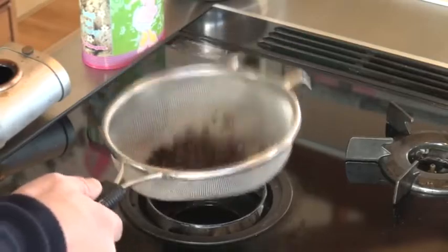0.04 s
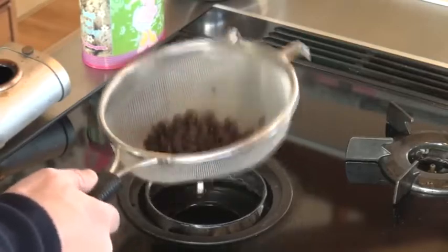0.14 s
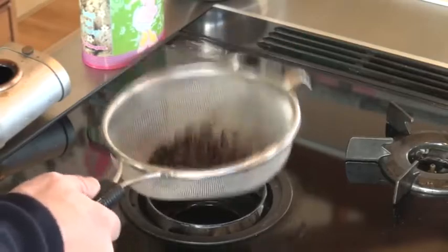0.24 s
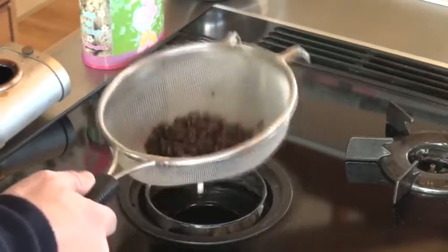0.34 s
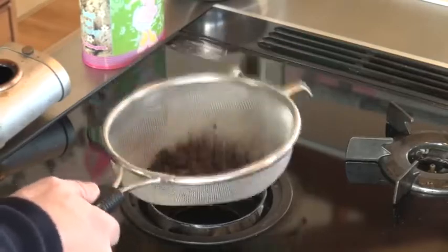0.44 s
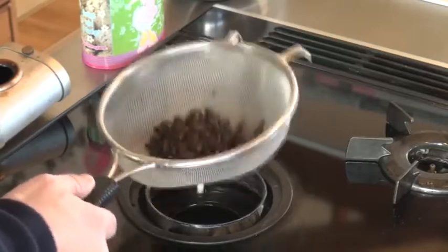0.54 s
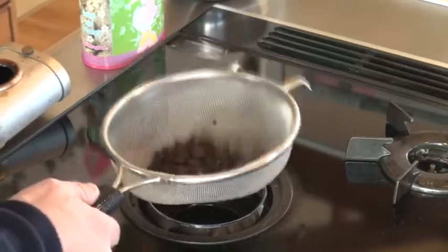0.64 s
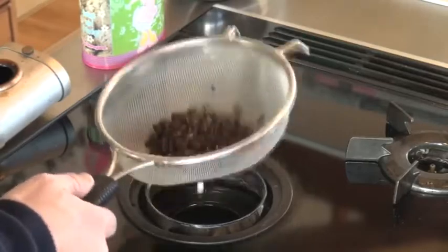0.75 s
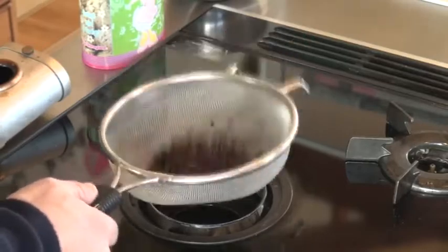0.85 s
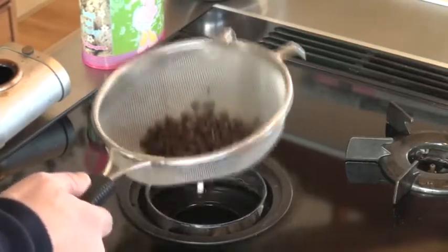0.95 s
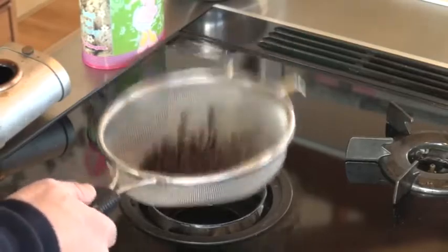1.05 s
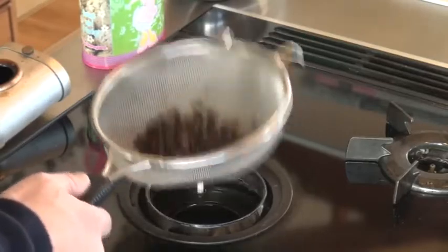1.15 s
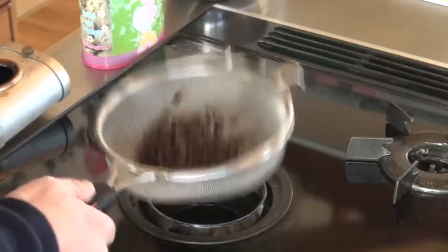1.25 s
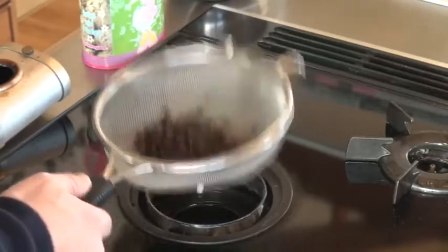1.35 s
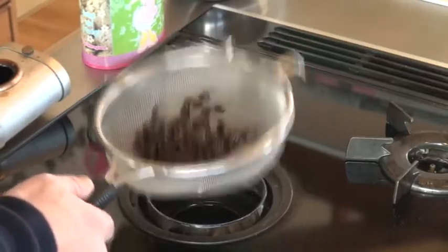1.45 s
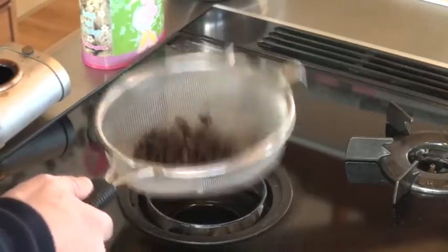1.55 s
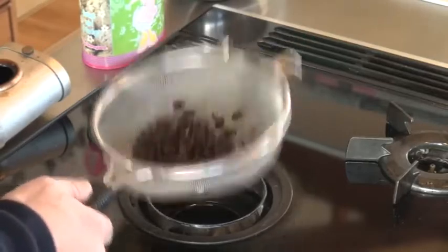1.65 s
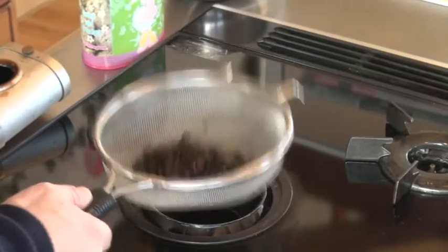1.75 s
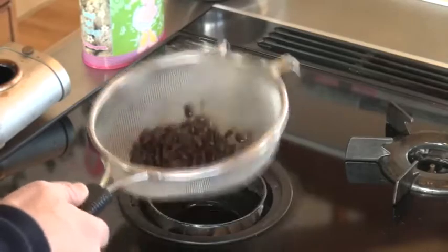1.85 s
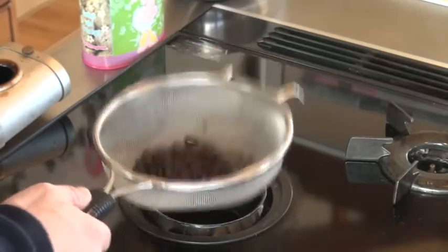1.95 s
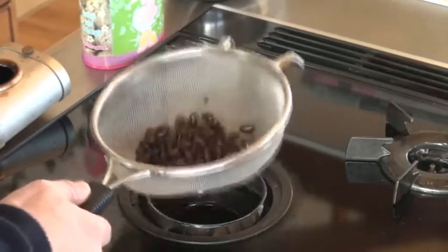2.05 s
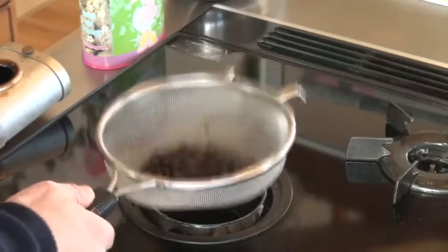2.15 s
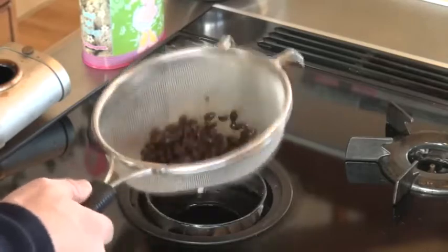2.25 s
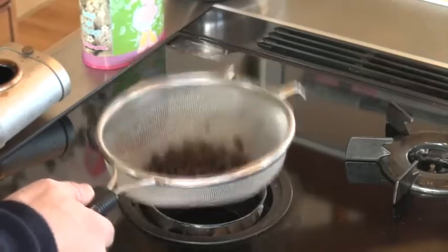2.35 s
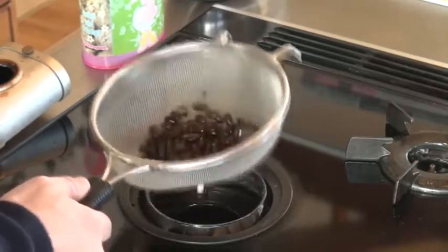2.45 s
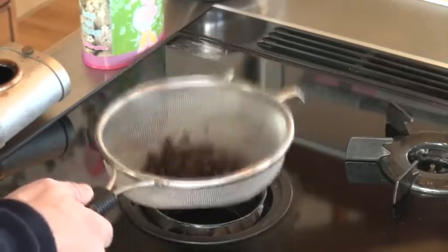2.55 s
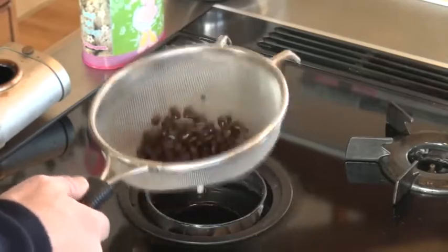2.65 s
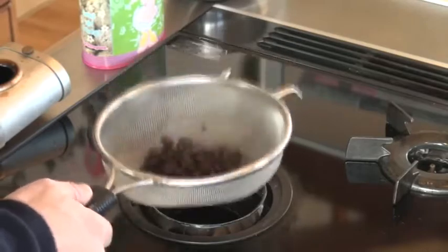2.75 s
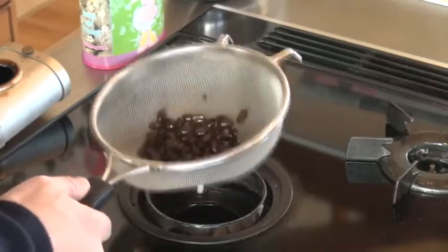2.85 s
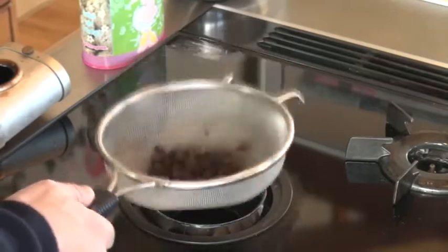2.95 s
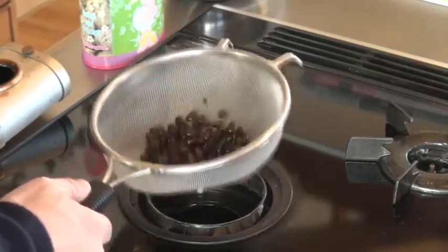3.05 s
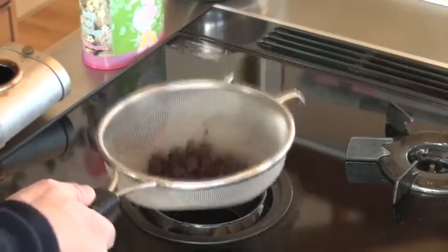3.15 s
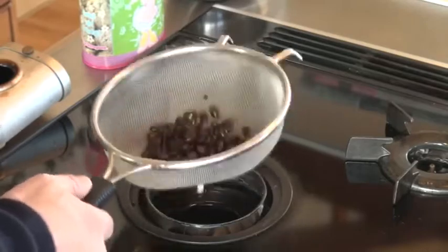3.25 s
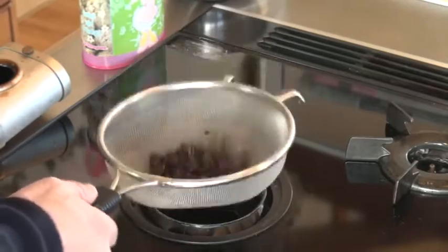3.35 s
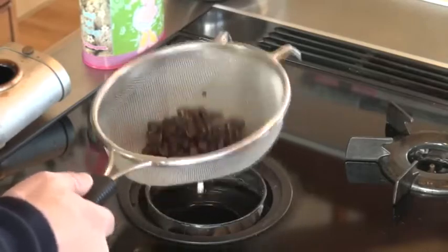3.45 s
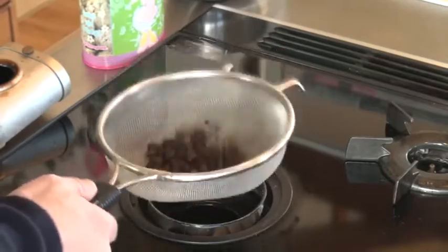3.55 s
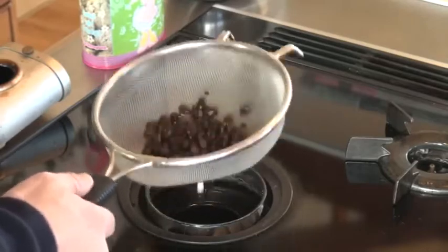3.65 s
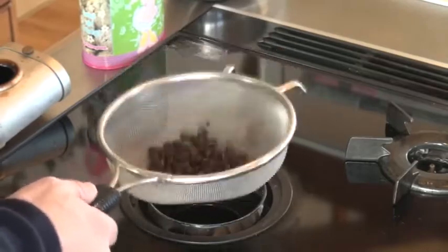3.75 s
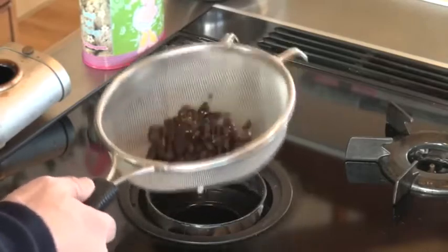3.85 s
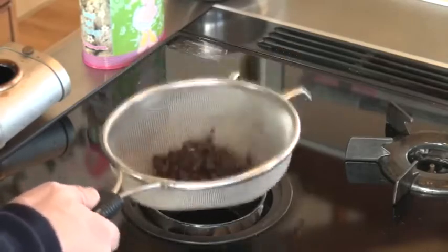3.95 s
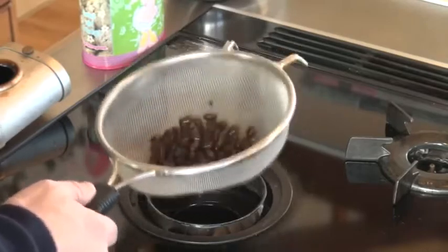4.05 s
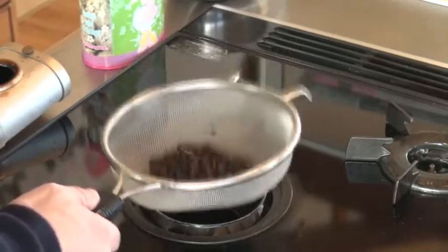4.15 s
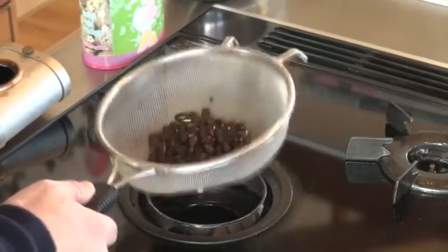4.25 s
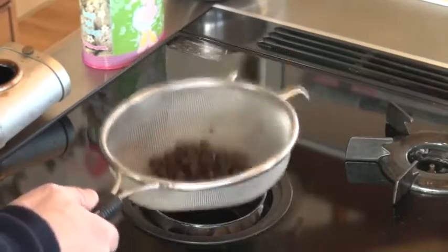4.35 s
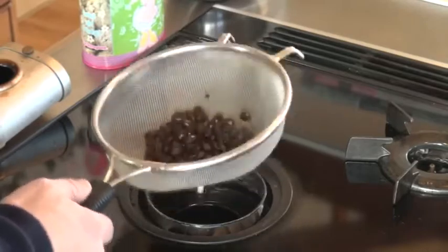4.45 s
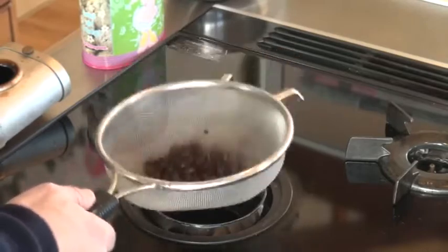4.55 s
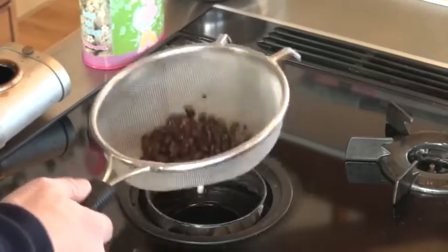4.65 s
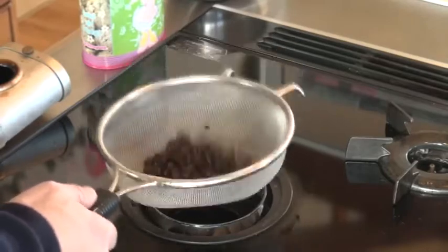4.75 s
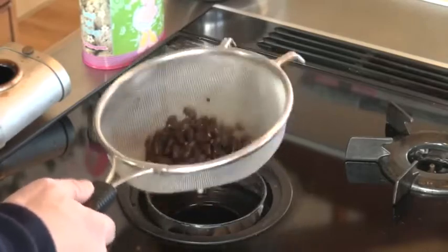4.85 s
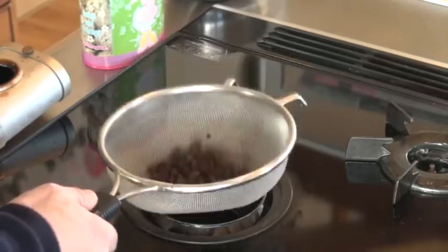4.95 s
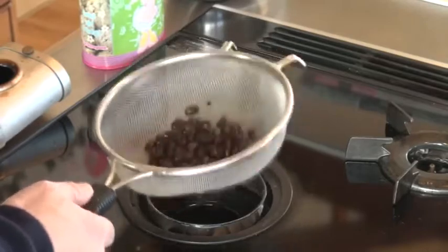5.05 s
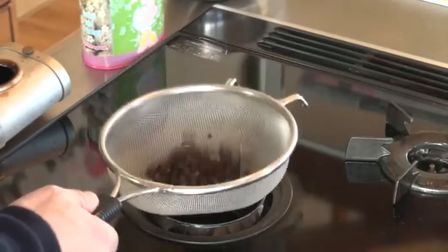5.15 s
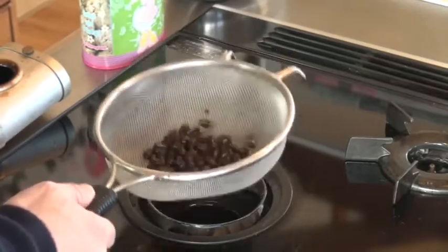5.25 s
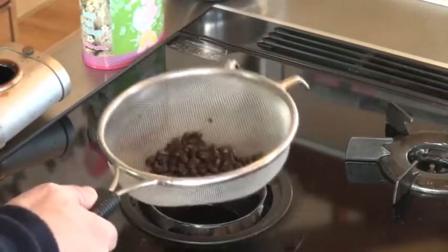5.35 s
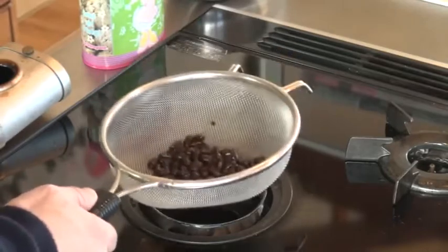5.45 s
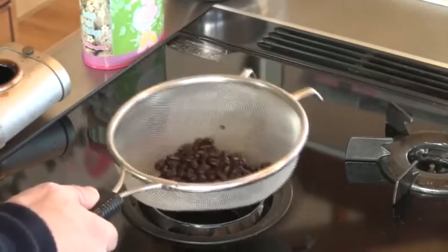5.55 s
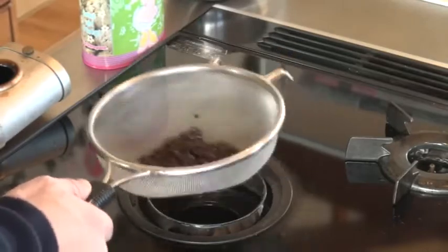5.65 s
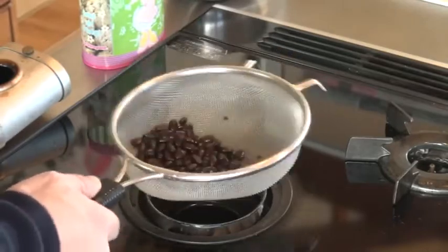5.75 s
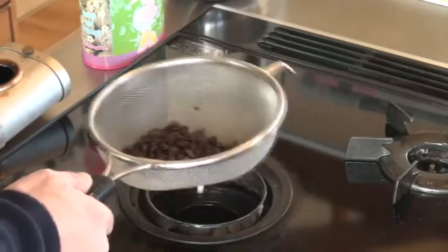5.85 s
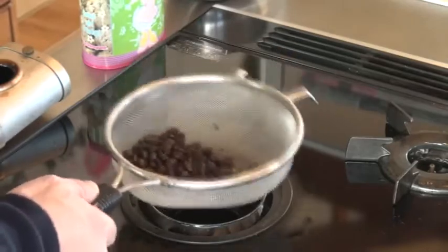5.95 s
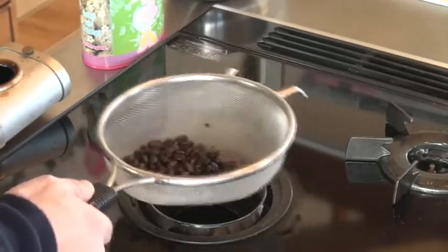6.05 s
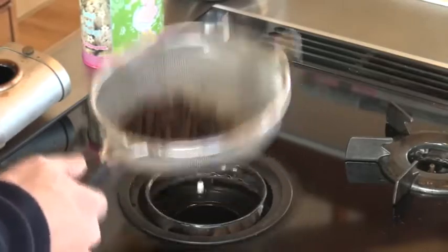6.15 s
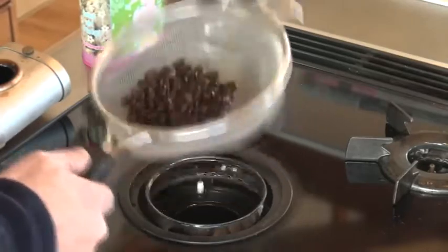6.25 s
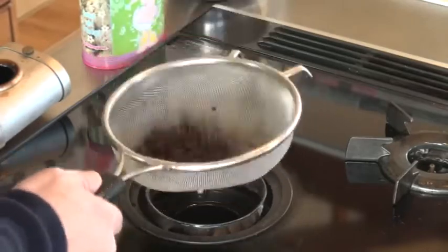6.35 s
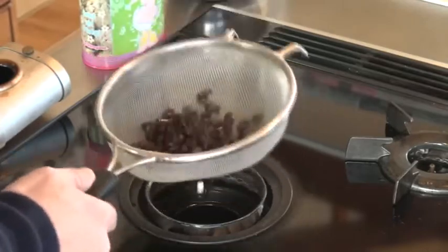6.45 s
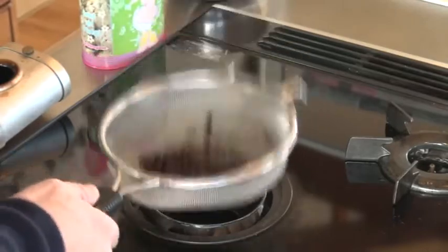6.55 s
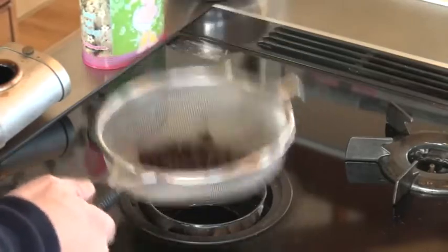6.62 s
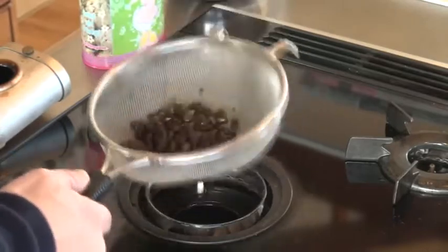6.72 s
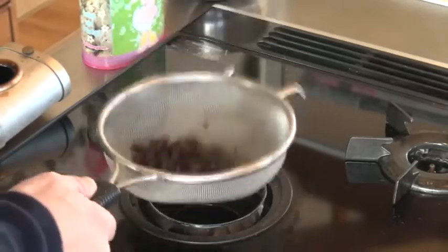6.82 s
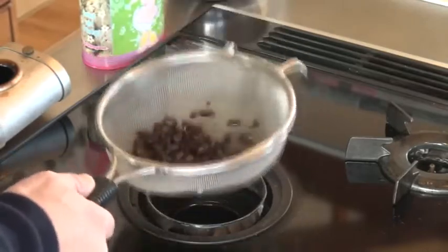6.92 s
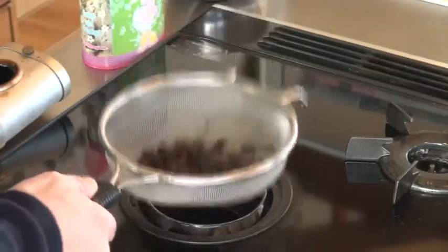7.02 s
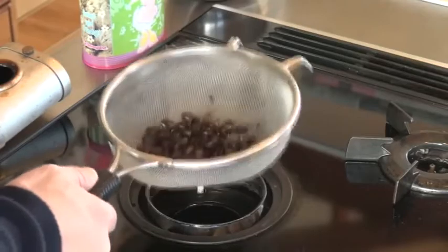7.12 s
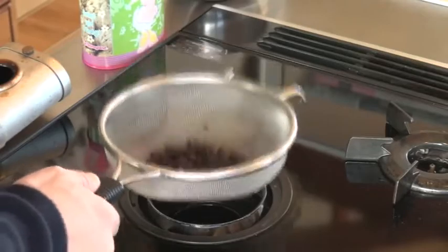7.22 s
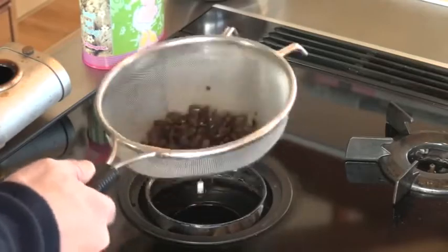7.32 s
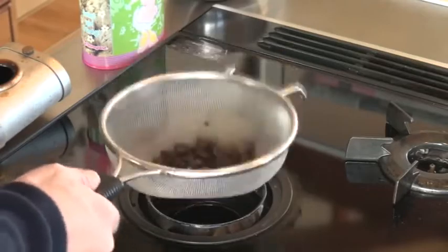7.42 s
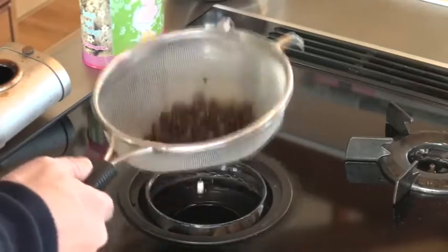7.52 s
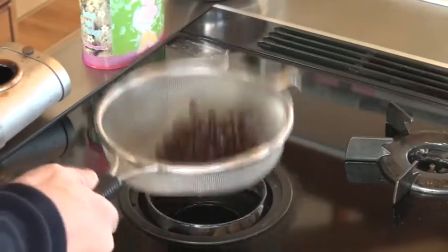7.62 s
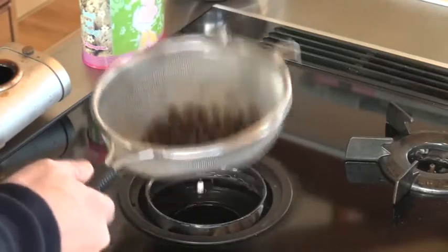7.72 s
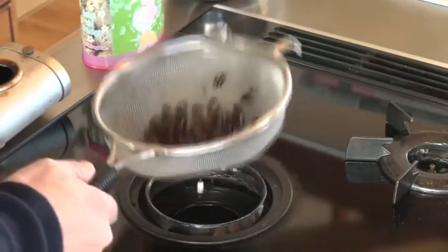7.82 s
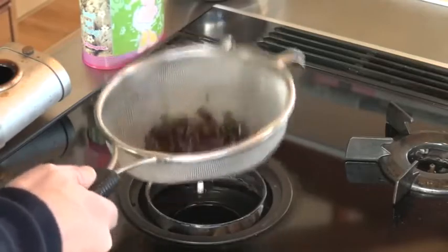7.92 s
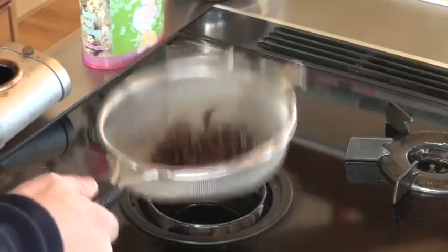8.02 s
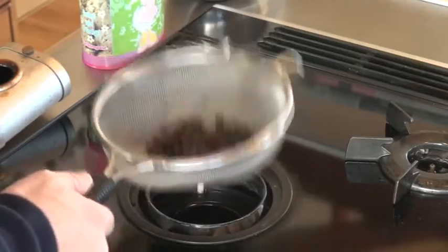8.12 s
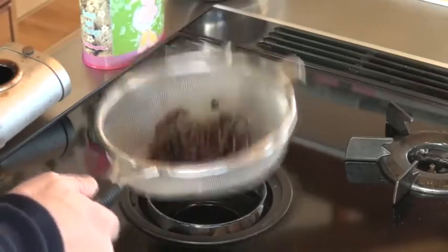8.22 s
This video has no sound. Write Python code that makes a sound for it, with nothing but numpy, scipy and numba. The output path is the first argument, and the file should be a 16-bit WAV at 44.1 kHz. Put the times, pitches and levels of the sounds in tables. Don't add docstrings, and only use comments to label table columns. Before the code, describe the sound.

Bright, dry shaker-like bursts of beans landing on metal mesh, pausing for soft sliding, then resuming unevenly beneath a constant extractor hum.

```python
import sys
import numpy as np
from scipy import signal
from scipy.fft import rfft, irfft
from scipy.io import wavfile
from numba import njit

SR = 44100
rng = np.random.default_rng(int(sys.argv[2]) if len(sys.argv) > 2 else 0)


def linear_from_db(decibels):
    return 10 ** (np.asarray(decibels, float) / 20)


def file_out(sig):
    cols = np.atleast_2d(sig).T
    lim = np.clip(cols, -1, 1)
    pcm = np.round(lim * 32767).astype(np.int16)
    wavfile.write(sys.argv[1], SR, pcm)


N = 365148

# hz, side_minus_mid_db
PORT_SPREAD = [(30, -1), (60, -19), (200, -17.5), (700, -16), (1000, -12.5), (1700, -17.5), (2800, -11),
               (4400, -13.5), (5500, 0.5), (6500, -1.5), (8500, 0.5), (11000, 0.5), (15000, -3)]


def curve(table, hz):
    at_hz, value = np.transpose(table)[:2]
    return np.interp(np.log(hz + 1), np.log(at_hz), value)


def colour(x, db_of_hz, size=8192):
    cepstrum = irfft(db_of_hz(np.arange(size // 2 + 1) * SR / size) * np.log(10) / 20)
    cepstrum[1:size // 2] *= 2
    cepstrum[size // 2 + 1:] = 0
    impulse = irfft(np.exp(rfft(cepstrum)))
    return signal.oaconvolve(x, impulse[None], axes=1)[:, :N]


def unit(x):
    return x / np.sqrt(np.mean(x ** 2))


def around(mid, side):
    side = colour(side[None], lambda hz: curve(PORT_SPREAD, hz), size=2048)[0]
    return np.array([mid + side, mid - side])


def fan(level_db=-54.5, ripple_db=2.25, ripple_hz=35):
    # hz, db_per_hz
    air_noise = [(25, -23), (50, -26), (85, -24), (105, -10), (240, -5.5), (300, -9.5), (600, -13),
                 (860, -15), (1500, -16), (2400, -22), (3600, -23), (6500, -41.5), (9000, -49),
                 (16000, -45)]
    # hz, width_hz, lift_db
    hood = [(65, 9.8, 14.5), (35, 8.3, -2), (98, 8.6, 4.5), (139.3, 23.4, 8.5), (181.5, 9.4, 6),
            (264.7, 12, 8), (313.4, 4.6, 7), (385.3, 8.7, 14), (454.7, 40, 7.5), (696.6, 43, 9),
            (726, 18, 10.5), (602, 34, -12), (856, 44, -14), (1677, 57, 5.5), (1965, 15, 9.5),
            (2163, 63, 10)]
    comb = rng.standard_normal(1000)

    def gain_db(hz):
        lift = sum((linear_from_db(db) ** 2 - 1) / (1 + (2 * (hz - f) / width) ** 2) for f, width, db in hood)
        ripple = ripple_db * np.interp(hz / ripple_hz, np.arange(len(comb)), comb)
        ripple = ripple * np.clip(hz / 250 - 3.3, 0, 1)
        return curve(air_noise, hz) + 10 * np.log10(np.maximum(1 + lift, .1)) + ripple

    mid, side = colour(rng.standard_normal((2, N + SR)), gain_db, size=16384)
    return linear_from_db(level_db) * unit(around(mid, side))


def catches():
    # start_s, level_db, settle_ms
    steady = [(0.004, -40.5, 19), (0.21, -41, 21), (0.409, -41, 16.4), (0.603, -40, 18.5), (0.8, -40, 17),
              (1.007, -38, 15.5), (1.216, -39, 21.4), (1.442, -38, 17.2), (1.648, -39.5, 30.4),
              (1.864, -39, 25), (2.07, -41.5, 18.5), (2.276, -40, 18.6), (2.48, -40, 21), (2.69, -39, 25.7),
              (2.884, -40.5, 21.6), (3.092, -39, 14.3), (3.289, -39.5, 18.8), (3.496, -41, 22),
              (3.703, -39, 12.4), (3.893, -40, 15.7), (4.089, -40, 15), (4.279, -42.5, 14.5),
              (4.49, -38.5, 12), (4.697, -41, 29), (4.9, -41.5, 19.7), (5.1, -40, 19.5), (5.299, -39, 18.7)]
    # start_s, level_db, settle_ms, gather_ms
    sliding = [
        (5.745, -60, 18, 26),
        (5.855, -52.5, 32, 47),
        (5.958, -54, 21, 30),
        (6.055, -56, 24, 33),
        (6.171, -62, 24, 39),
    ]
    # start_s, level_db, settle_ms, gather_ms
    loose = [
        (6.501, -36, 21.3, 17.5),
        (6.711, -45, 34, 21.4),
        (6.96, -39, 16.8, 28.7),
        (7.137, -42, 21.7, 20.3),
        (7.344, -43.5, 25, 21),
        (7.568, -41, 14, 24),
        (7.805, -36.5, 13.4, 24.2),
        (8.002, -49.5, 16, 23),
        (8.033, -49.5, 17, 9.1),
        (8.205, -40, 15.6, 20.4),
    ]
    gather_ms = 20.7
    rows = [(*row, gather_ms, 0) for row in steady]
    rows += [(*row, 1) for row in sliding] + [(*row, 0) for row in loose]
    return np.array(rows, float).T[:, :, None]


def heap(count, late_share, late_ms, late_db, scatter_db, edge_db, steep, blunt):
    slide_edge = 0.66
    start_s, level_db, settle_ms, gather_ms, slides = catches()
    when, luck = rng.random((2, len(start_s), count))
    when, late = 4 * when - 2, luck < late_share
    spread_s = np.where(when < 0, gather_ms, settle_ms) * 1e-3
    time_s = start_s + np.where(late, late_ms * 0.0015 * (when + 2), spread_s * when)
    swell_db = edge_db * slide_edge ** slides * np.abs(when) ** np.where(when < 0, steep, blunt)
    swell_db = swell_db - 36 * np.maximum(-1.3 + 0.08 * rng.standard_normal(when.shape) - when, 0)
    shape_db = np.where(late, late_db - 6.3 * (when + 2), swell_db)
    size_db = scatter_db * rng.standard_normal(when.shape)
    per_contact = np.sqrt((gather_ms + settle_ms) / count)
    return time_s, linear_from_db(level_db + shape_db + size_db) * per_contact * (time_s >= 0)


@njit
def grains(start, hz, cycles, size, lead, length):
    out = np.zeros((2, length))
    for k in range(len(start)):
        turn = np.exp(2j * np.pi * hz[k] / SR - hz[k] / (cycles[k] * SR))
        z, shift = size[k] + 0j, np.exp(1j * lead[k])
        first = max(start[k], 0)
        for i in range(first, min(first + int(5 * cycles[k] * SR / hz[k]) + 2, length)):
            push = min((i - first + 1) * hz[k] / SR, 1.)
            out[0, i] += push * (z * shift).real
            out[1, i] += push * (z / shift).real
            z *= turn
    return out


def contacts(time_s, gain, low_hz, high_hz, cycles, spread_rad, shine_db=0):
    pitch, ring, place = rng.random((len(time_s), 3)).T
    hz = low_hz + (high_hz - low_hz) * pitch
    ring_cycles = cycles * (0.49 + ring) * np.sqrt(hz / 6000)
    gain = gain * np.sqrt(hz / ring_cycles / SR * 4)
    gain = gain * linear_from_db(shine_db * np.clip((hz - 7000) / 3000, -.3, 1))
    lead_rad = spread_rad * (2 * place - 1) * linear_from_db(curve(PORT_SPREAD, hz))
    return grains((time_s * SR).astype(np.int64), hz, ring_cycles, gain, lead_rad, N)


def beans():
    # start_s, peak_db, ring_hz
    strays = [(.558, -67, 9000), (.917, -57, 9000), (1.105, -53, 9000), (1.294, -52, 9000),
              (1.344, -57, 9000), (1.404, -48, 7000), (1.613, -54, 7000), (2.782, -56, 9000),
              (3.356, -51, 9000), (3.557, -42, 9100), (4.039, -62, 9050), (5.447, -49, 9000),
              (5.813, -45, 7000), (6.107, -62, 7000), (6.415, -57, 11000), (6.482, -39, 14000),
              (6.772, -36, 13000), (6.812, -52, 13000), (6.916, -49, 10000), (7.206, -38, 8160),
              (7.369, -30, 13500), (8.12, -49, 12000), (8.177, -44, 9000)]
    # hz, gain_db
    rattle = [(530, -70.5), (900, -11), (1810, -1.5), (2300, -2), (2500, 3), (3070, -4), (4520, 3.5),
              (5350, 2), (5750, 6), (7230, 8), (9090, -4), (13400, 0), (15100, -5), (16000, -37)]
    time_s, gain = heap(count=1300, late_share=0.025, late_ms=32, late_db=-8,
                        scatter_db=2.0, edge_db=-7.0, steep=1.84, blunt=1.7)
    _, level_db, _, _, slides = catches()
    shine_db = -0.8 + 0.26 * (level_db + 40) - 2.5 * slides
    shine_db = shine_db + 0 * time_s
    crowd = contacts(time_s.ravel(), gain.ravel() * linear_from_db(23.0), 696, 16900, 1.6, 0.63, shine_db.ravel())
    at_s, peak_db, ring_hz = np.repeat(strays, 4, axis=0).T
    at_s = at_s + 0.0012 * rng.random(len(at_s))
    lone = contacts(at_s, linear_from_db(peak_db + 1.5), 0.55 * ring_hz, 1.23 * ring_hz, 2.7, .7)
    return colour(crowd + lone, lambda hz: curve(rattle, np.minimum(hz, 14600)), size=1024)


def rim():
    # hz, width_hz, level_db
    frame_modes = [(1090, 250, -19), (1400, 200, 0), (1720, 130, 3), (2110, 320, -4.5), (2495, 89, 8),
                   (2530, 71, -4), (4500, 930, 2)]
    time_s, gain = heap(count=200, late_share=0.048, late_ms=28, late_db=-10,
                        scatter_db=4.5, edge_db=-12.0, steep=2.6, blunt=1.7)
    luck_db = 2.5 * rng.standard_normal((len(time_s), 1))
    knock = linear_from_db(-11 + luck_db + 23.5)
    blows = contacts(time_s.ravel(), (gain * knock).ravel(), 860, 6040, 0.83, .6)
    out = np.zeros_like(blows)
    for hz, width_hz, db in frame_modes:
        out += linear_from_db(db) * signal.lfilter(*signal.iirpeak(hz, hz / width_hz, fs=SR), blows)
    return out


def kitchen(dry, gap_ms=5, size=20000, count=4):
    # hz, t60_s, level_db
    room_bands = [(1500, 0.58, -4), (3100, 0.35, -4.5), (4650, 0.46, -8), (7000, 0.4, -8.5),
                  (10000, 0.31, -10.5), (14000, 0.23, -16.5)]
    t_s, hz = np.arange(size) / SR, np.arange(size // 2 + 1) * SR / size
    noise, tails = rfft(rng.standard_normal((count, 2, size))), 0
    for k, (_, t60_s, db) in enumerate(room_bands):
        share = curve([(row[0], float(j == k)) for j, row in enumerate(room_bands)], hz)
        fade = 10 ** (-3 * t_s / t60_s) * (1 - np.exp(-t_s / (gap_ms * 0.0013)))
        tails = tails + linear_from_db(db) * irfft(noise * share) * fade / np.sqrt(np.sum(fade ** 2))
    place = np.searchsorted(catches()[0, :, 0] - .06, np.arange(N) / SR) % count
    mono, wet = dry.mean(axis=0), 0
    for j, tail in enumerate(tails):
        wet = wet + signal.oaconvolve((mono * (place == j))[None], tail, axes=1)[:, :N]
    return around(*wet)


def scene():
    strainer = beans() + rim()
    return strainer + kitchen(strainer) + fan()


def band_limit(x):
    return signal.sosfilt(signal.butter(12, 16850, fs=SR, output="sos"), x)


def record(dry):
    # hz, left_minus_right_db
    balance = [(30, -4), (70, 3.5), (130, 1.8), (300, .5), (1200, -0.5), (2500, 0.4), (5000, -0.3),
               (7000, 1.5), (9000, -0.5), (14000, -0.6)]
    left = colour(dry[:1], lambda hz: curve(balance, hz) / 2, size=2048)[0]
    right = colour(dry[1:], lambda hz: -curve(balance, hz) / 2, size=2048)[0]
    top_cut = signal.ellip(12, .2, 70, 15800, fs=SR, output="sos")
    mix = signal.sosfilt(top_cut, [left, right])
    return band_limit(mix)


dry = scene()
out = record(dry)
file_out(out)
```